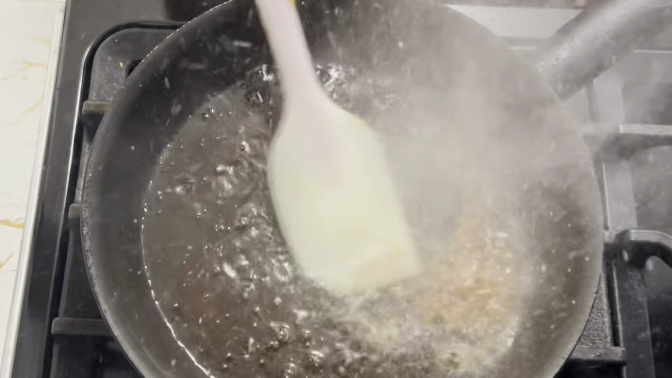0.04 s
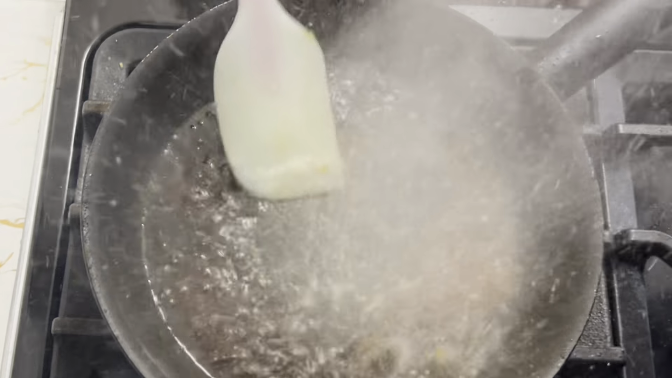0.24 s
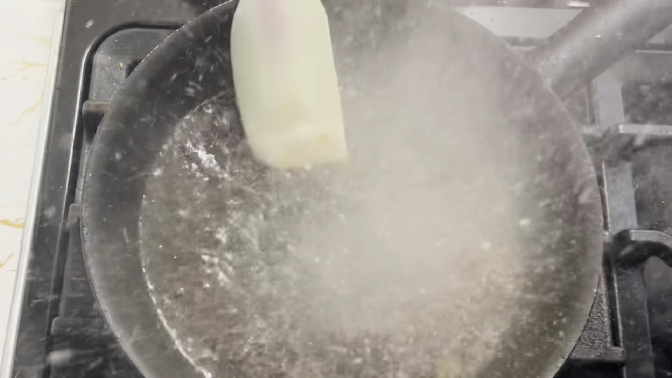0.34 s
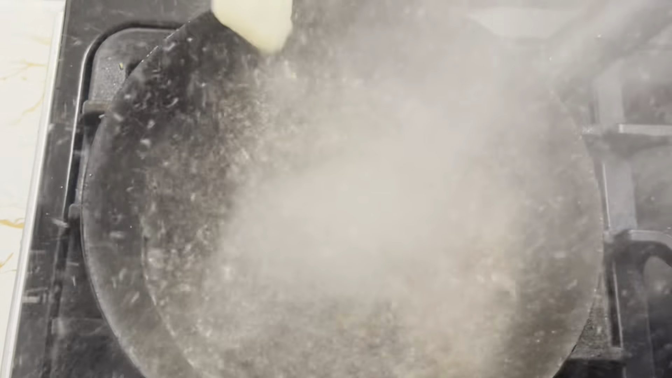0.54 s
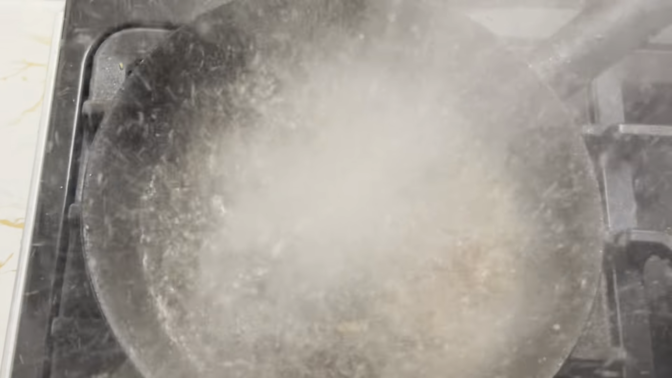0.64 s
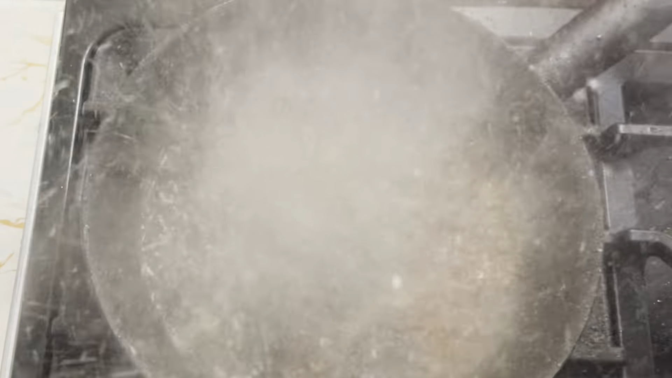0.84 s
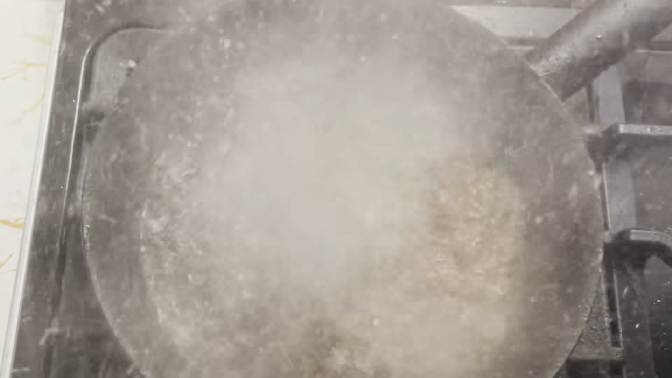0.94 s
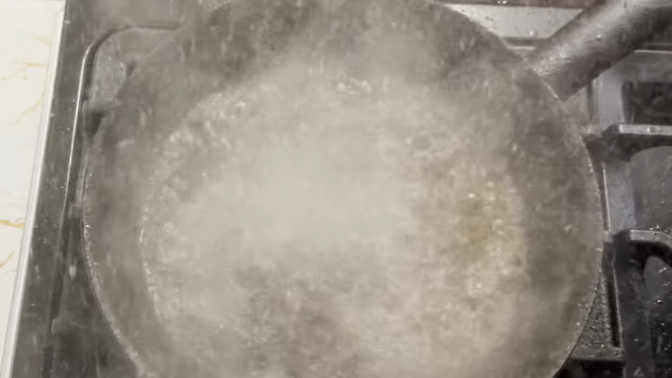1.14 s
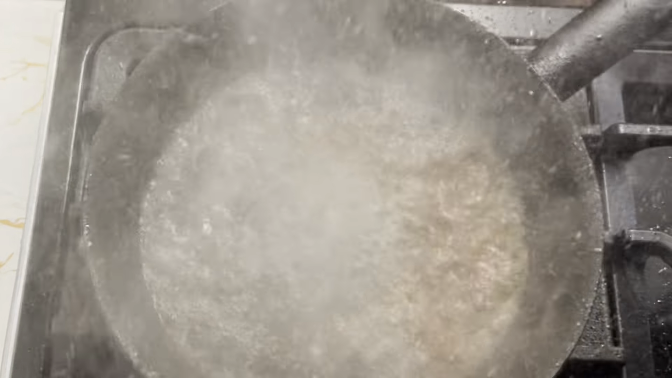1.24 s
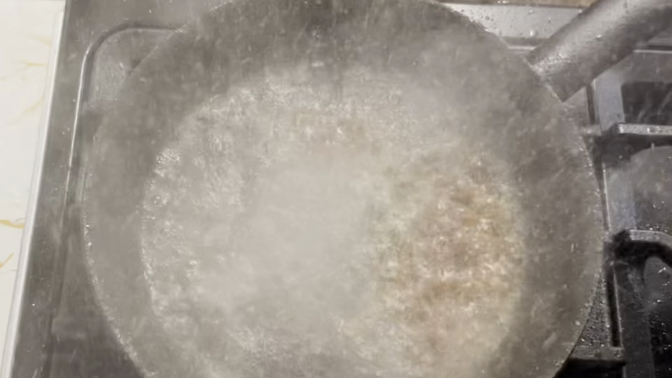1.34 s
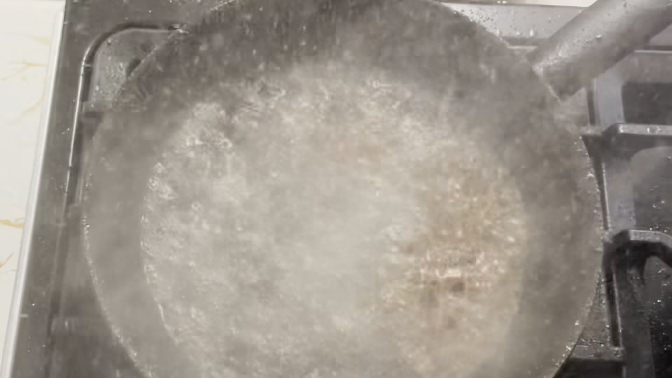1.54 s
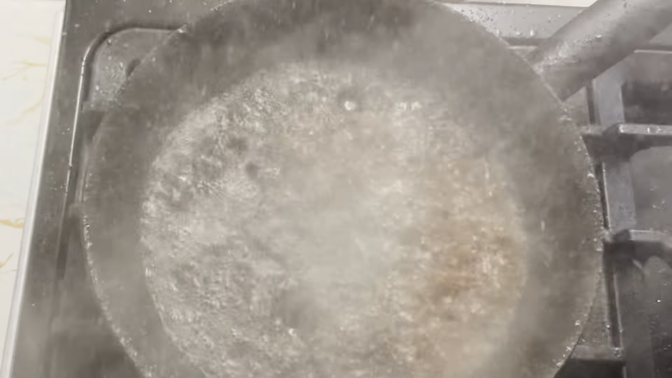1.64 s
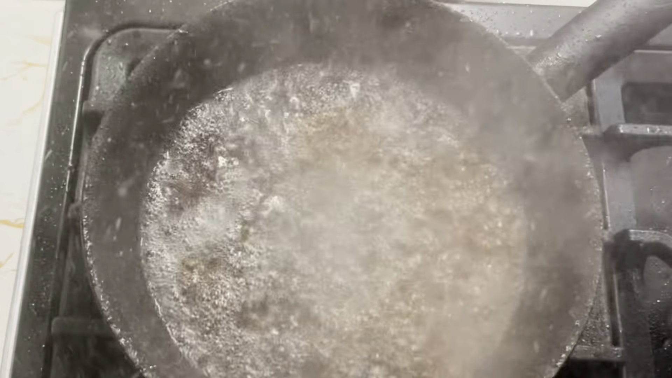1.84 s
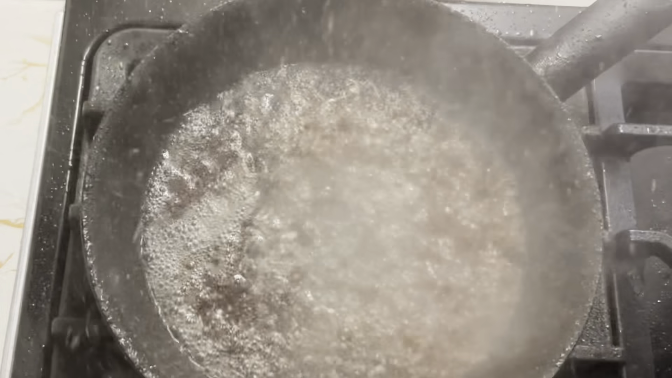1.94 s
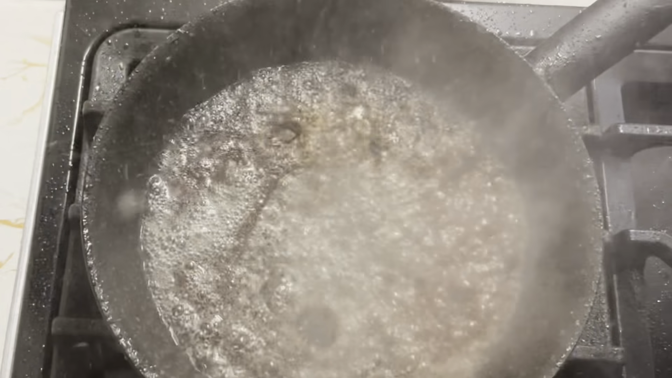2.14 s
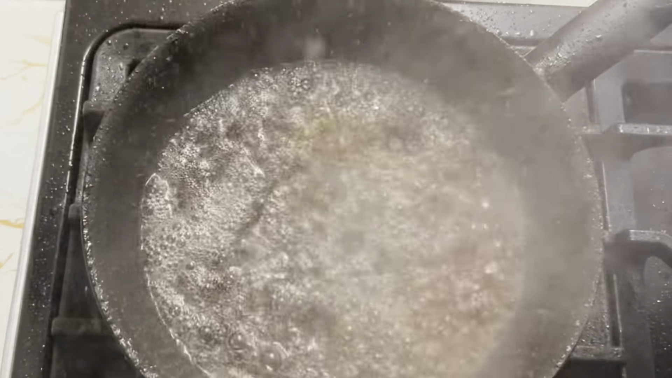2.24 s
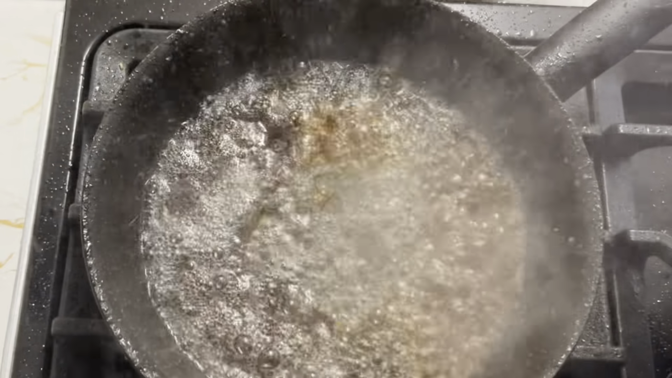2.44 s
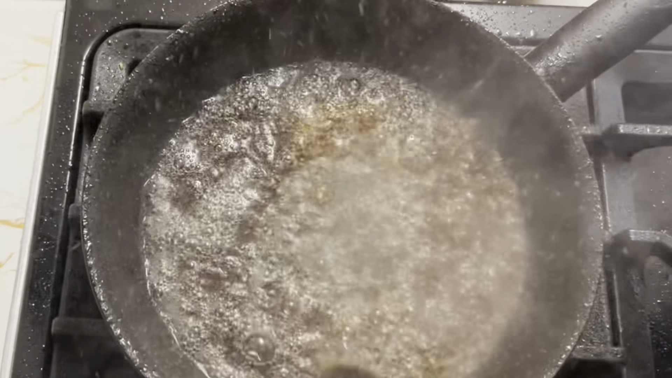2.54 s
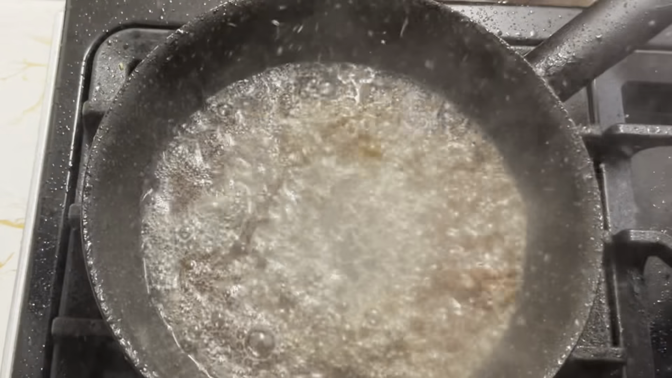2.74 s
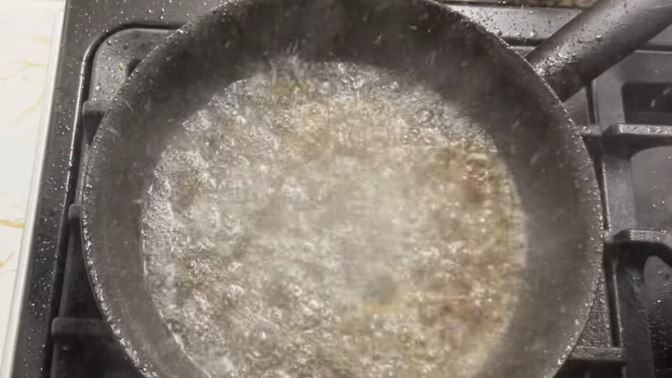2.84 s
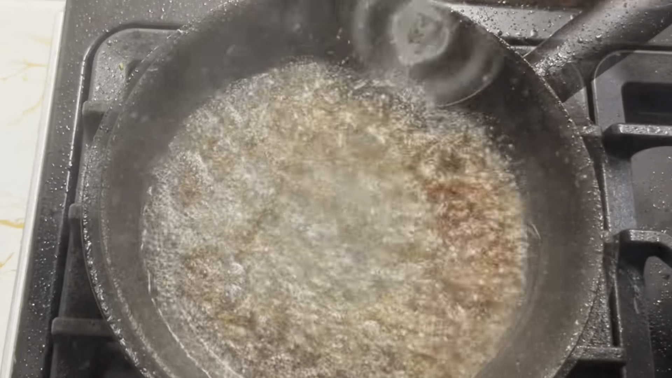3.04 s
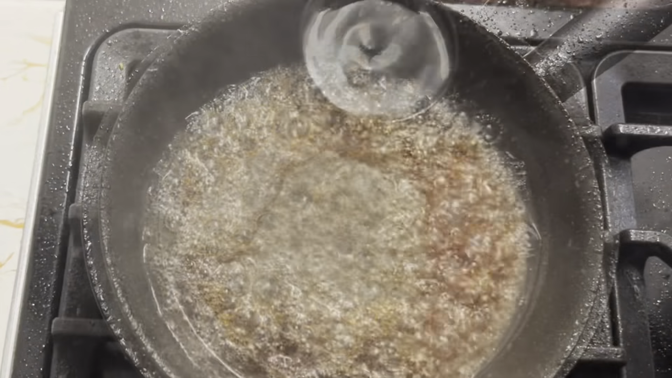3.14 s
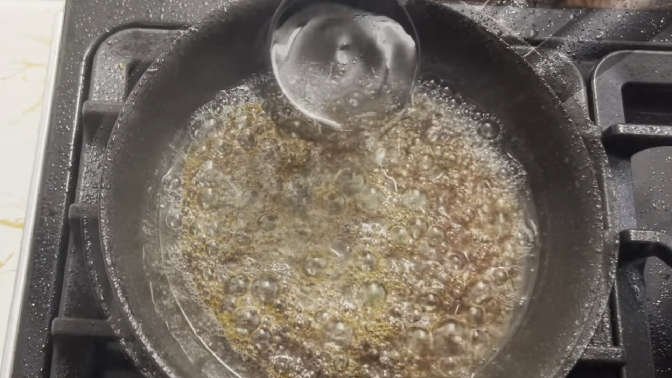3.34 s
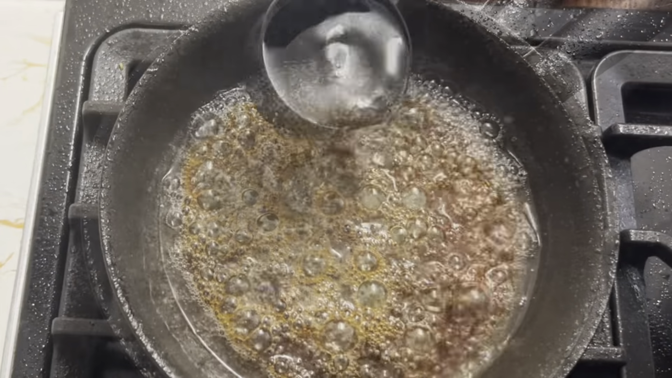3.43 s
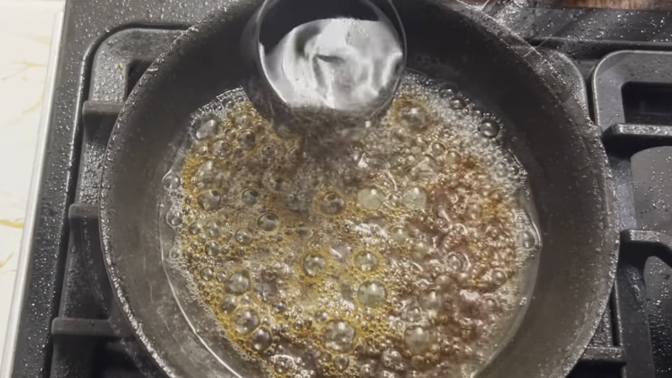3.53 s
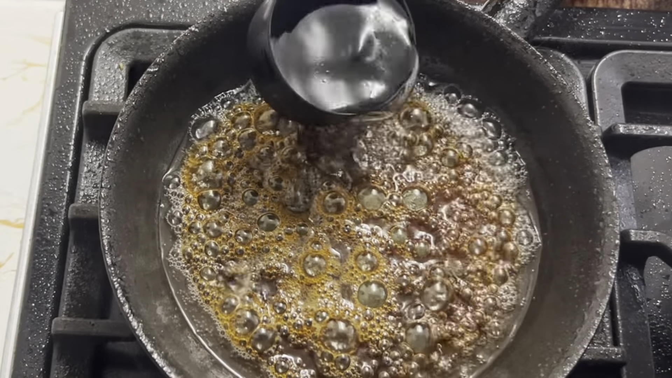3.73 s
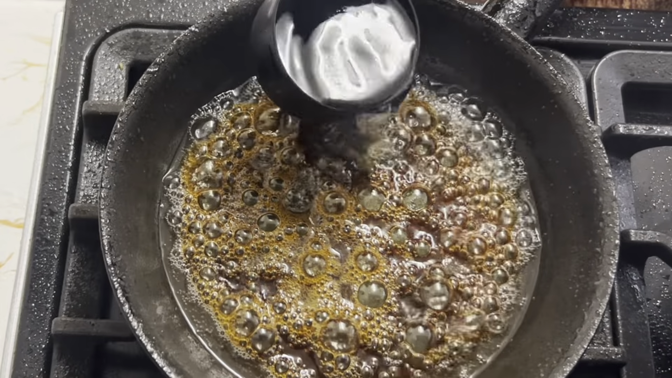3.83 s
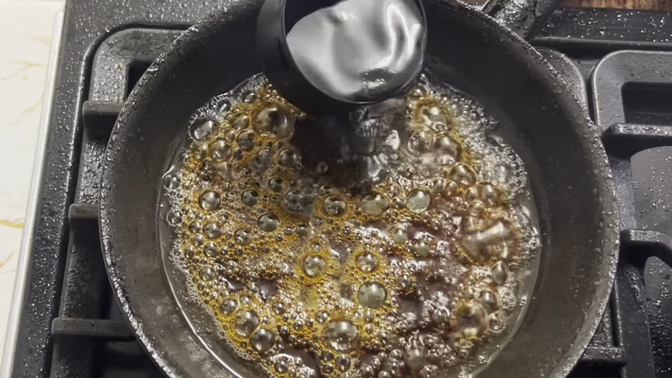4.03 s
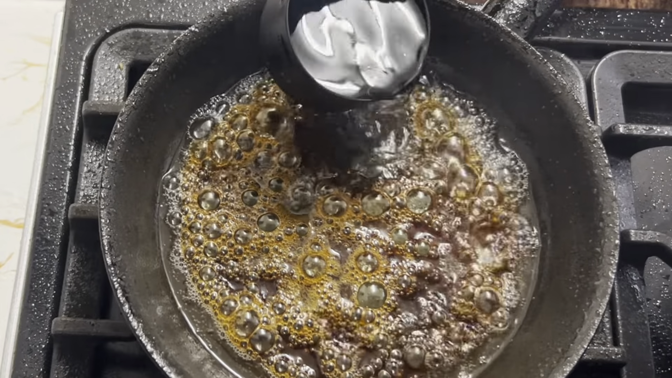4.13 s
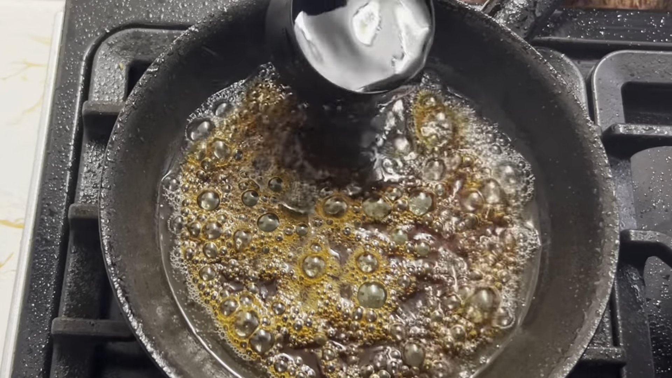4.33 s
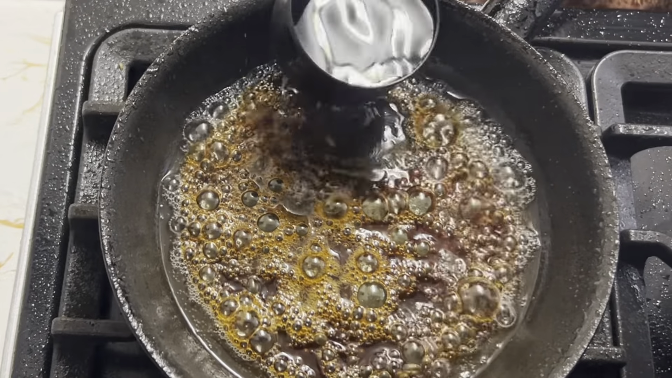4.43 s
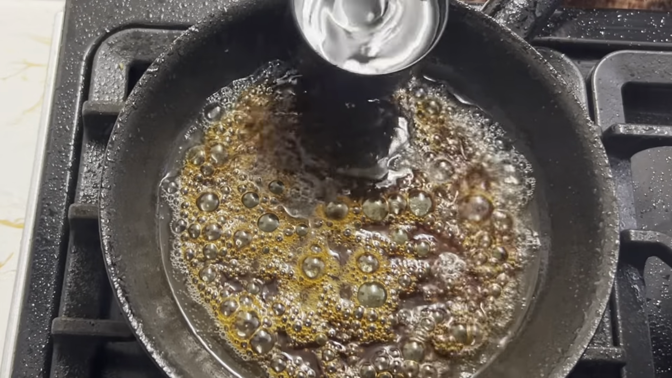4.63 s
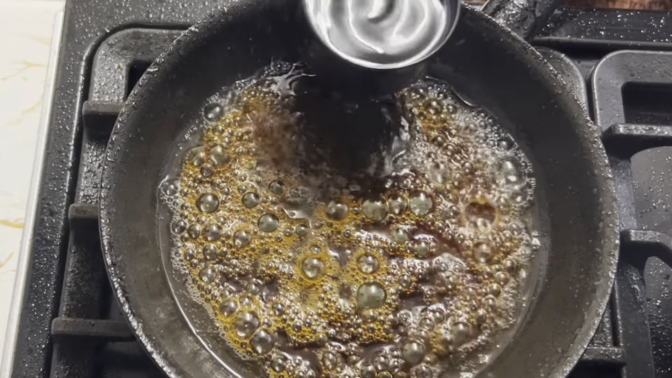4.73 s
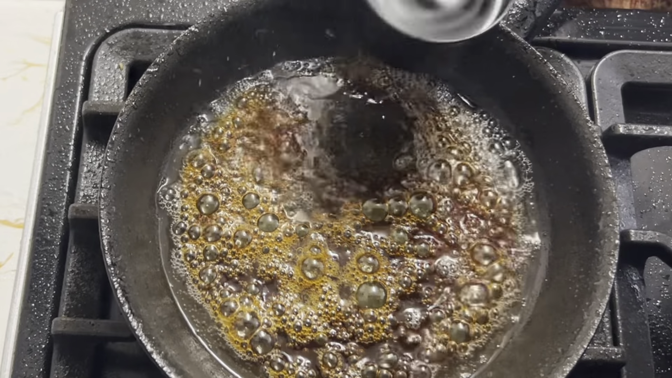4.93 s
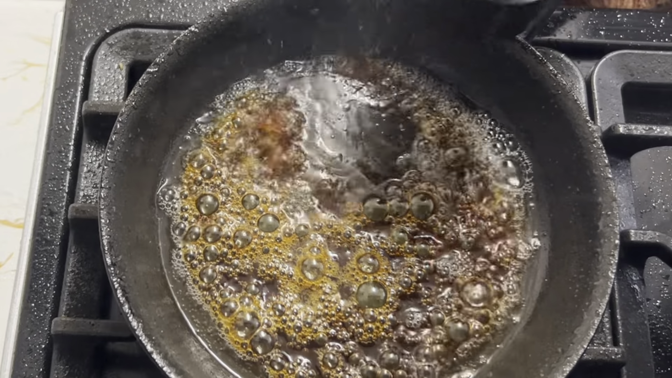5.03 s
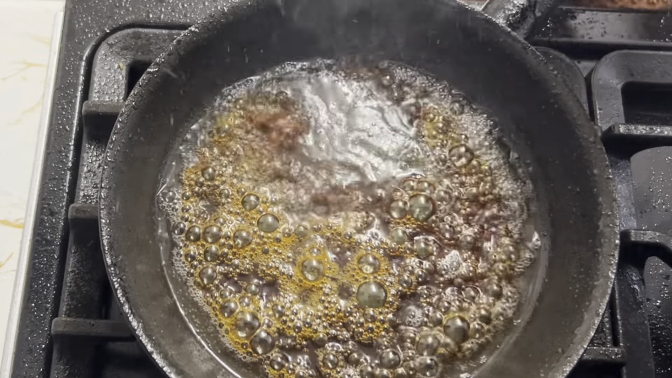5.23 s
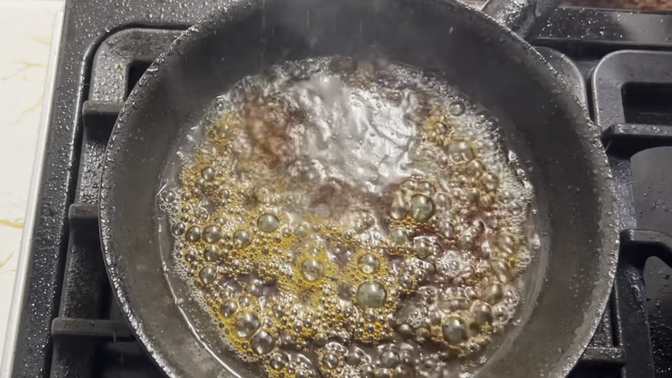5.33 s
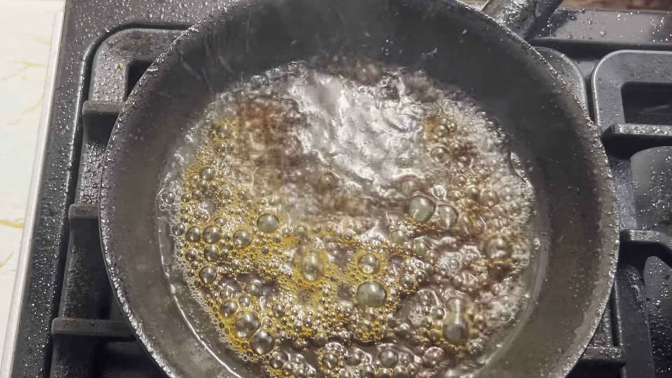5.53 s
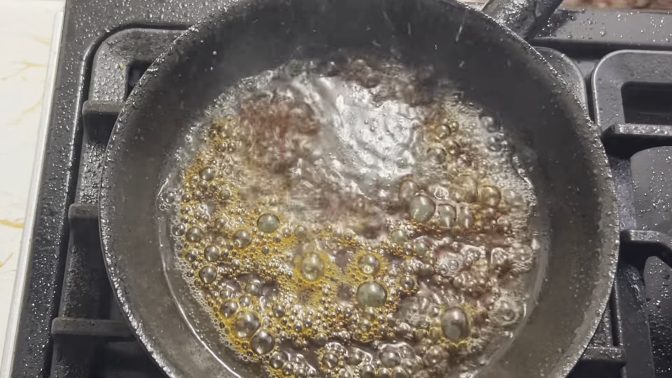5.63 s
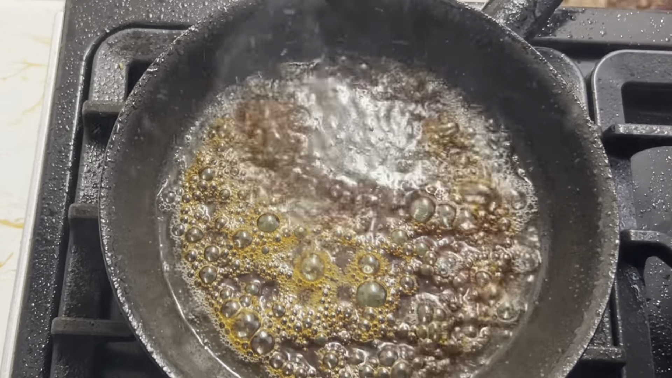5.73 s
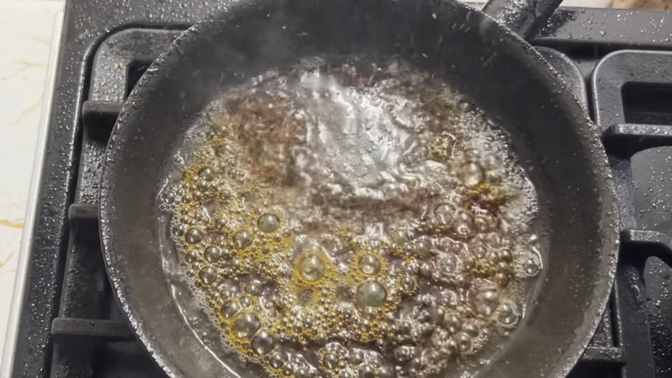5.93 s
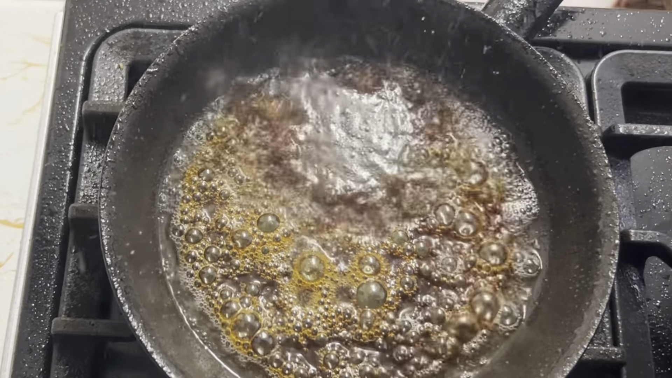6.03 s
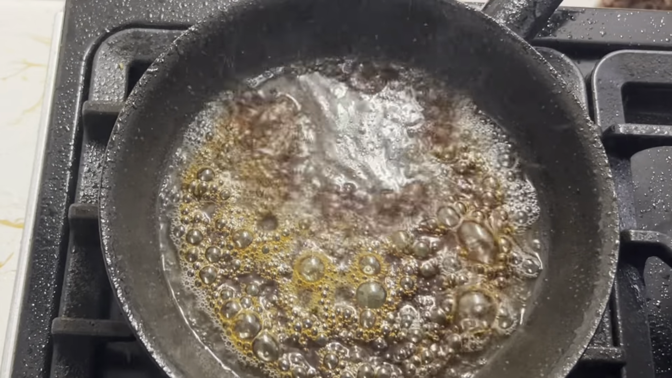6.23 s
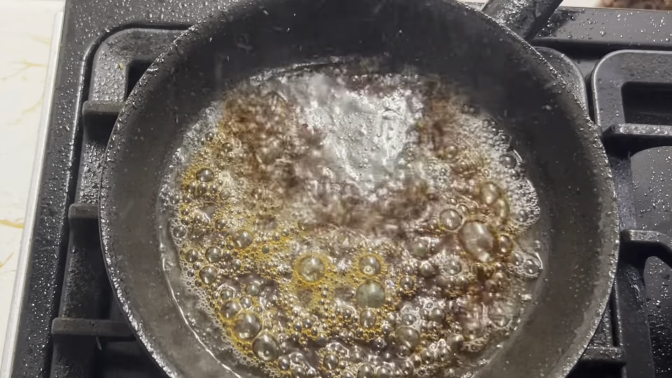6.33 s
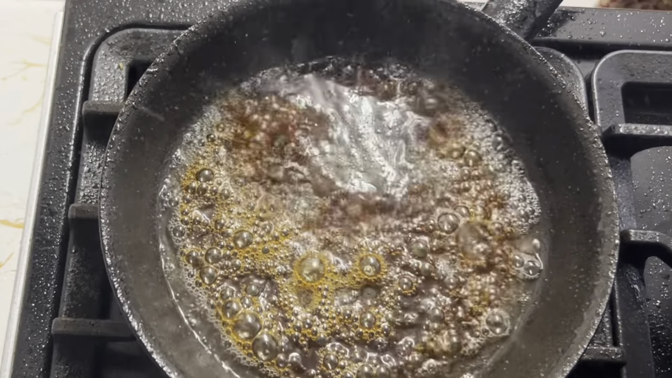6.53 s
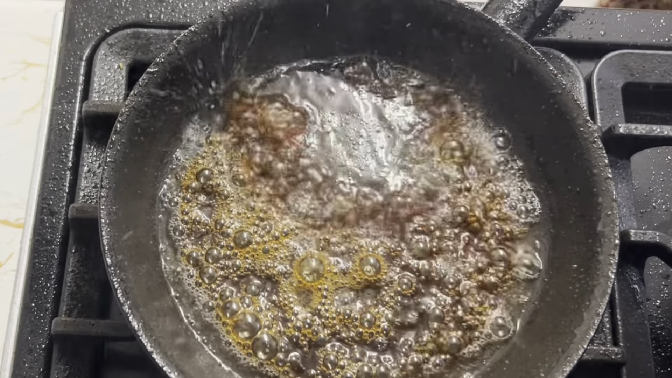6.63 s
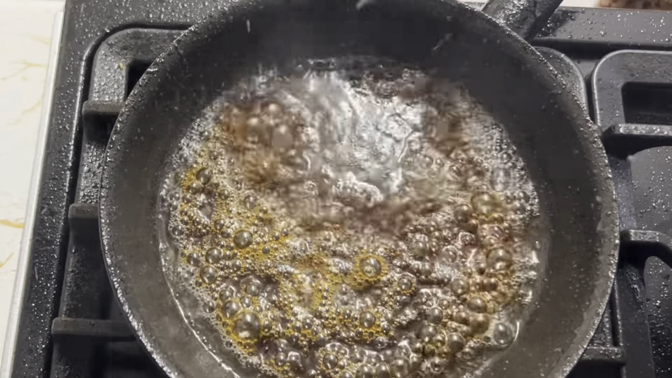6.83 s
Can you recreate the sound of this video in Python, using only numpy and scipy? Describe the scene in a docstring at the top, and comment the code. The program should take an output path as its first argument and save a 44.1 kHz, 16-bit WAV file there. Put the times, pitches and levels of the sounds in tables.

```python
"""Hot caramel and oil sizzle and pop as water boils off; poured water quenches them to single plops.
The sizzle then flares up again and thickens to a simmer, over a low hum and a rumble.
Random clicks through the colour and ring of the pan make the sizzle, crackle and pops.
Bubbles are short rising notes, gulps of steam are diving ones, spits and splashes are filtered noise.
A phone above the stove picks up the pan with the echoes of a small kitchen."""
import sys
import numpy as np
from scipy import signal
from scipy.fft import rfft, irfft, next_fast_len
from scipy.io import wavfile
from scipy.ndimage import uniform_filter1d

SR = 44100
rng = np.random.default_rng(int(sys.argv[2]) if len(sys.argv) > 2 else 0)


def wav_out(sig):
    """Save sig, one row per channel (or a flat mono array), as 16-bit PCM at SR to the path in sys.argv[1]."""
    wavfile.write(sys.argv[1], SR, np.round(np.clip(np.atleast_2d(sig).T, -1, 1) * 32767).astype(np.int16))


N = 417186
T = np.arange(N) / SR
SPOTS = 6  # places on the pan, each with its own random bursts and its own path to the phone
TOP_HZ = 16000  # highest pitch that the phone keeps


def undb(db):
    """Turn decibels into a gain."""
    return 10 ** (np.asarray(db) / 20)


def unit(x):
    """Scale to an rms (average strength) of 1."""
    return x / np.sqrt(np.mean(x ** 2))


def curves(table):
    """Draw straight lines between the table rows: each column as one value per sample."""
    s, *columns = np.transpose(table)
    return [np.interp(T, s, column) for column in columns]


def ramp(start_s, length_s):
    """A steady change from 0 to 1."""
    return np.clip((T - start_s) / length_s, 0, 1)


def swell(s, half_s):
    """A smooth rise to 1 at s seconds and back."""
    return np.exp(-((T - s) / half_s) ** 2)


def walk(rate):
    """Random levels held for 1 / rate seconds, with smooth slides between them; rms 1."""
    k = int(SR / rate)
    steps = np.repeat(rng.standard_normal(N // k + 1), k)
    return unit(uniform_filter1d(steps, k)[:N])


def seconds(length):
    """Time axis of a short sound."""
    return np.arange(int(length * SR)) / SR


def fade(t, t60):
    """Die away by 60 dB in t60 seconds."""
    return np.exp(-np.log(1000) * t / t60)


def band(x, lo_hz, hi_hz):
    """Keep the pitches between two limits, with gentle edges."""
    return signal.sosfilt(signal.butter(2, [lo_hz, hi_hz], "band", fs=SR, output="sos"), x)


def add(track, s, sound):
    """Mix a short sound in at s seconds."""
    i = int(np.clip(s * SR, 0, len(track) - 1))
    track[i:i + len(sound)] += sound[:len(track) - i]


def response(points):
    """A pulse of unit energy with the given spectrum, its energy as early as possible (minimum phase)."""
    size = 2048
    hz, db = np.transpose(points)
    bins_hz = np.arange(size // 2 + 1) * SR / size
    spectrum = undb(np.interp(np.log(bins_hz + 1), np.log(hz), db))
    cepstrum = irfft(np.log(spectrum))
    cepstrum[1:size // 2] *= 2
    cepstrum[size // 2 + 1:] = 0  # nothing may sound before the pulse
    h = irfft(np.exp(rfft(cepstrum)))
    return h / np.linalg.norm(h)


def through(x, h):
    """Send every row of x through the response h."""
    return signal.oaconvolve(x, np.atleast_2d(h), axes=1)[:, :N]


def hum(wavers_per_s=7, drift=0.0057):
    """Two low tones in the kitchen, drifting slightly in pitch, the upper one less steady in level."""
    # the tones: [f/Hz, rms level/dB before the changes below, waver/dB]
    hum_tones = [(48.4, -52.5, 1), (102.5, -52.5, 3)]
    # how the level of the hum changes: [t/s, change/dB]
    hum_levels = [(0, -2), (1.1, -5), (1.4, -30), (2.9, -17), (3.3, -10), (3.65, 0), (6.4, 1.5), (7.3, -4),
                  (9.46, -2.5)]
    tones = 0
    for hz, db, waver_db in hum_tones:
        turns = hz * np.cumsum(1 + drift * walk(2.6)) / SR
        tones = tones + undb(db + waver_db * walk(wavers_per_s)) * np.sin(2 * np.pi * turns)
    return np.sqrt(2) * tones * undb(curves(hum_levels)[0])


def kitchen(spots, near_db, room_db, near_t60=0.036, room_t60=0.18, apart_hz=1700, spacing_s=.00001):
    """Each spot reaches the phone's two ports directly, off the pan wall and stove, and through the room."""
    t, out, ports = seconds(.3), 0, np.array([[1], [-1]])
    dull = signal.butter(8, 8500, fs=SR, output="sos")
    apart = signal.butter(1, apart_hz, "high", fs=SR, output="sos")  # long waves reach both ports alike
    for spot, place in zip(spots, np.linspace(-1, 1, SPOTS)):
        h = np.sinc((t - .0004 + ports * place * spacing_s / 2) * SR)  # the direct sound
        for db, t60 in (near_db, near_t60), (room_db, room_t60):
            mid, side = signal.sosfilt(dull, rng.standard_normal((2, len(t))))
            both = 0.64 * mid + 0.77 * ports * signal.sosfilt(apart, side)
            echoes = both * fade(t, t60) * (t > .0008)
            h = h + undb(db) * echoes / np.linalg.norm(fade(t, t60))
        out = out + through(np.array([spot, spot]), h)
    return out


def cancel(x):
    """Echoes off the stove and wall cancel the direct sound at some pitches: cut dips there."""
    # the dips, cut one after the other: [f/Hz, width/Hz, depth/dB]
    echo_dips = [(463, 46, -14), (599, 55, -14), (749, 37, -3), (1310, 32, -7), (1763, 53, -3.5),
                 (2170, 54, -0.5)]
    for hz, width, db in echo_dips:
        x = x - (1 - undb(db)) * signal.lfilter(*signal.iirpeak(hz, hz / width, SR), x)
    return x


def rumble(level_db, side_db=-10):
    """The churning liquid shakes the pan on its grate: low noise of wavering level, nearly alike on both sides."""
    # spectrum of the rumble: [f/Hz, relative level/dB]
    rumble_colour = [(25, -26), (70, -16.5), (105, 0.5), (140, -2.5), (240, -5), (330, -8.5), (480, -13),
                     (900, -15.5), (3000, -102)]
    noise = through(rng.standard_normal((2, N)), response(rumble_colour))
    mid, side = noise * undb(level_db + 1.5 * walk(13))
    return mid + undb(side_db) * np.array([side, -side])


def gulps(rough=0.082, flutter_hz=220, opening=0.15, rise_s=0.016):
    """A large pocket of steam bursts open and swells fast, so its note dives and grows; its wall flutters."""
    # the pockets, the one at 0.821 s a low tail that rings on after the big gulp at 0.762 s: [t/s, level/dB
    # before the slow rise and fade, first f/Hz, last f/Hz, fade by 60 dB/s]
    steam_pockets = [(0.556, -18, 500, 110, 0.064), (.672, -23, 1000, 115.9, 0.054),
                     (0.762, -1.5, 695, 62, 0.098), (0.821, -32, 250, 51.67, 0.45),
                     (1.398, -15, 650, 400, 0.031), (2.208, -30, 600, 150, 0.046),
                     (2.437, -38, 600, 250, .05), (2.541, -24, 593, 60, 0.06),
                     (8.024, -27, 696, 260, 0.056), (8.224, -24, 210, 202, 0.11),
                     (8.282, -29, 210, 193, 0.16)]
    swell_s = .0038  # how fast the note dives
    out, t = np.zeros(N), seconds(.5)
    for s, db, first_hz, last_hz, t60 in steam_pockets:
        hz = last_hz + (first_hz - last_hz) * np.exp(-t / swell_s)
        flutter = unit(band(rng.standard_normal(len(t)), flutter_hz / 2, flutter_hz * 1.9))
        note = np.sin(2 * np.pi * np.cumsum(hz) / SR) + rough * flutter
        growth = 1 - (1 - opening) * np.exp(-(t / rise_s) ** 2)
        add(out, s, undb(db) * note * fade(t, t60) * growth)
    return out


def bubble(hz, cycles, glide=0.11, rise_s=0.00025):
    """A bubble rings as it opens: a short fading note, its pitch creeping up."""
    t60 = max(cycles / hz, .003)
    t = seconds(t60)
    note = np.sin(2 * np.pi * hz * t * (1 + glide * t / t60))
    return note * fade(t, t60) * (1 - np.exp(-t / rise_s))


def bubbling(level_db, per_second, low_hz, octaves, cycles, spread_db, count=1, cluster_s=.035, kinship=.12):
    """Random bubbles, large low ones more common, open in clusters of count that are alike in pitch."""
    out = np.zeros((SPOTS, N))
    clusters = int(per_second / count * N / SR)
    for k, cluster in enumerate(rng.random((clusters, count, 6))):
        when, pitch = cluster[0, :2]
        for size, damping, lag, offset in cluster[:, 2:]:
            hz = low_hz * 2 ** (octaves * pitch ** 1.2 + kinship * (2 * offset - 1))
            loud = undb(-spread_db * np.log(size + 0.052))
            note = bubble(hz, cycles * (.5 + damping))
            add(out[k % SPOTS], when * N / SR + cluster_s * lag, loud * note)
    return unit(out) / np.sqrt(SPOTS) * undb(level_db)


def plops(cycles=25, wet=0.34, splash_t60=0.01):
    """Large bubbles open one by one, each a ringing note with a small noisy splash around it."""
    # the single bubbles: [t/s, level/dB before the pan and room, f/Hz]
    single_bubbles = [(3.585, -30.5, 1790), (3.603, -27, 1780), (3.664, -24, 1710), (3.672, -21, 1620),
                      (3.678, -25, 1490), (3.696, -29, 1610), (3.703, -39, 2700), (3.742, -28, 1600),
                      (3.83, -32, 1840), (3.869, -35, 1500), (3.9, -29, 2580), (3.956, -31, 806),
                      (3.964, -23, 1750), (4.044, -25, 1750), (4.123, -34, 1410), (4.15, -36, 2500),
                      (4.272, -28, 1570), (4.376, -19.5, 2660), (4.407, -24, 2480), (4.724, -15, 1540),
                      (4.752, -11, 8100), (5.015, -18, 1500), (7.188, -8.5, 6660), (7.617, -13.5, 6630),
                      (7.958, -17.5, 2900), (8.158, -22, 1580), (8.237, -22, 3100), (8.251, -20, 1590),
                      (8.284, -21, 2980), (8.444, -19.5, 2430), (8.492, -21, 2300), (8.515, -17.5, 1860),
                      (8.564, -13.5, 2500), (8.636, -24, 1600), (8.652, -21, 2630), (8.688, -20, 2200),
                      (8.722, -21, 1600), (8.923, -26.5, 1610), (9.028, -17, 1720), (9.052, -15, 1650),
                      (9.055, -18, 2880), (9.069, -24, 2800), (9.077, -17, 1710), (9.087, -22.5, 1620),
                      (9.222, -23, 1480), (9.261, -18, 6070), (9.324, -28, 1480), (9.381, -27, 5100),
                      (9.403, -12.5, 2050)]
    out, t = np.zeros((SPOTS, N)), seconds(0.03)
    for k, (s, db, hz) in enumerate(single_bubbles):
        noise = band(rng.standard_normal(len(t)), hz * 0.55, hz * 1.07)
        splash = unit(noise) * fade(t, splash_t60)
        add(out[k % SPOTS], s, undb(db) * bubble(hz, cycles, glide=0.04))
        add(out[k % SPOTS], s, undb(db) * wet * splash)
    return out


def on_pan(pulse, direct_db, scatter_db=2.5, detune=0.0072):
    """A pulse plus the short ring of the liquid-damped pan, a little different on each spot; unit energy."""
    # what the pan rings with, before the random scatter: [f/Hz, width/Hz, relative level/dB]
    pan_rings = [(521.4, 20, 1), (851, 52, -3), (1034, 45, 3.5), (1237, 57, 1), (1576, 255, -0.5),
                 (1880, 170, -2), (2420, 160, -3.5), (2650, 200, 2), (3163, 54, 2), (3496, 90, -1),
                 (4940, 81, -3)]
    out = []
    for chance in rng.standard_normal((SPOTS, len(pan_rings), 2)):
        h = undb(direct_db) * pulse
        for (hz, width, db), (louder, sharper) in zip(pan_rings, chance):
            ringing = signal.iirpeak(hz * (1 + detune * sharper), hz / width, SR)
            h = h + undb(db + scatter_db * louder) * signal.lfilter(*ringing, pulse)
        out.append(h / np.linalg.norm(h))
    return np.array(out)


def small_spits(sizzle_db, per_second=32, above_db=1.5, spread_db=2.5, low_hz=3300, octaves=1.33):
    """Lesser droplets spit at random, louder with the sizzle: rows of (s, level dB, pitch Hz)."""
    when, size, pitch = rng.random((int(per_second * N / SR), 3)).T
    i = (when * N).astype(int)
    level_db = sizzle_db[i] + above_db + spread_db * (2 * size - 1)
    return list(zip(i / SR, level_db, low_hz * 2 ** (octaves * pitch)))


def spitting(sizzle_db, t60=0.016, ratio=1.24):
    """A droplet flashes to steam: a few milliseconds of hiss around one pitch."""
    # the clearest spits: [t/s, level/dB before the fade and room, f/Hz]
    clear_spits = [(.13, -23, 6500), (.497, -18, 5200), (.554, -22, 8000), (.882, -20, 6000),
                   (1.04, -19, 7040), (1.235, -20, 5800), (2.734, -24, 8300), (2.839, -21.5, 7000),
                   (3.27, -24, 7000), (3.473, -35.5, 7600), (3.63, -28, 6030), (3.763, -36.5, 3050),
                   (3.902, -39, 3200), (4.117, -36, 5160), (4.208, -24, 8400), (4.505, -21, 6200),
                   (4.753, -18, 7200), (6.072, -17, 8400), (6.911, -19, 8400), (7.188, -16.5, 7200),
                   (7.382, -24, 7900), (7.618, -37, 5500), (7.686, -24, 5800), (8.071, -30, 5500),
                   (8.136, -22, 7000), (8.581, -27, 6800), (8.603, -24.5, 3400), (8.61, -30, 5000),
                   (8.909, -29, 6600), (8.942, -26, 4950), (8.951, -30, 4440), (9.043, -25, 3000),
                   (9.143, -27.5, 5600), (9.293, -25.5, 8000), (9.357, -35, 5900)]
    out, t = np.zeros((SPOTS, N)), seconds(0.039)
    for k, (s, db, hz) in enumerate([*clear_spits, *small_spits(sizzle_db)]):
        hiss = unit(band(rng.standard_normal(len(t)), hz / ratio, hz * ratio))
        add(out[k % SPOTS], s, undb(db) * hiss * fade(t, t60))
    return out


def bursts(rate, spread_db, largest=3.36):
    """Random clicks, rate per second over all spots of the pan: mostly tiny, a few large."""
    happens = rng.random((SPOTS, N), dtype=np.float32) < rate / SPOTS / SR
    draw = rng.laplace(size=(SPOTS, N))[happens]
    clicks = np.zeros((SPOTS, N))
    clicks[happens] = np.sign(draw) * undb(spread_db * np.minimum(abs(draw), largest))
    return unit(clicks / np.sqrt(rate)) / np.sqrt(SPOTS)  # as strong when bursts are rare


def spatter(level_db, snap, crack, snap_db=-5):
    """Flying droplets burst: dry cracks that reach from the ring of the pan to the top."""
    droplets = bursts(170, spread_db=4.5, largest=2.8) * undb(level_db)
    return through(droplets, crack + undb(snap_db) * snap)


def small_pops(boil_db, hiss_db, per_second=8, above_db=14.0, spread_db=8.0,
               snap_db=-9, snap_spread_db=9, cavity_hz=1900, octaves=0.58):
    """Lesser random pops grow with the boil and snap more where it hisses: rows as in the table of pops."""
    when, size, snap, pitch = rng.random((int(per_second * N / SR), 4)).T
    i = (when * N).astype(int)
    level_db = boil_db[i] + above_db + spread_db * (2 * size - 1)
    treble_db = hiss_db[i] + snap_db + snap_spread_db * (2 * snap - 1)
    return list(zip(i / SR, level_db, treble_db, cavity_hz * 2 ** (octaves * (2 * pitch - 1))))


def pops(boil_db, hiss_db, snap, knock, cool, level_db=8.0, tear=0.11, tear_t60=0.023,
         cavity_db=-3, muffled_hz=2300):
    """A pop is a sharp pulse, a tearing film and a few swings of the cavity left; cool water muffles it."""
    # single loud pops: [t/s, relative level/dB, treble snap/dB against the knock, cavity f/Hz]
    loud_pops = [(.015, -7, -12, 1620), (0.028, -3, -9, 1800), (.165, -7, -10, 1622), (0.192, -5, -7, 1700),
                 (.212, -13, -1, 1680), (.241, -5, 0, 2800), (0.254, -9, -16, 1100), (0.299, -2, -1, 1510),
                 (0.358, 0, 7, 2000), (0.428, -5, -9, 1300), (.486, -9, 6, 1612), (.497, -7, 10, 2000),
                 (.519, -15, 9, 1720), (0.651, -7, -7, 1850), (0.673, -1.5, -14, 947),
                 (0.700, -2, -10, 1740), (.724, -9, 15, 1800), (.849, -7.5, -20, 1060),
                 (.915, -12, 16, 2798), (1.016, -8, 10, 1620), (1.201, -7.5, 2, 1619), (1.32, -15, 8, 1600),
                 (1.369, -12, 8, 1800), (1.384, -6, 5, 3300), (1.399, -7, 7, 1800),
                 (1.418, -12.5, -12, 1500), (1.451, -13.5, 8, 1600), (1.465, -10.5, 9, 1700),
                 (1.507, -8.5, -6, 1700), (1.559, -17, 3, 1600), (1.598, -17, 4, 850),
                 (1.636, -15.5, -5, 990), (1.645, -12.5, -5, 1500), (1.869, -15.5, -7, 957),
                 (1.922, -16, 8, 1600), (2.034, -19, 2, 1100), (2.118, -21, 5, 1600),
                 (2.207, -8, -10, 1436), (2.248, -18, -4, 2600), (2.354, -16, -3, 1650),
                 (2.386, -15.5, -7, 995), (2.437, -12.5, -2, 984), (2.466, -17.5, -12, 900),
                 (2.522, -16, -12, 1500), (2.541, -5.5, 0, 1730), (2.608, -12.5, -17, 1720),
                 (2.648, -8.5, 7, 2770), (2.85, -15.5, 7, 1800), (2.929, -16, 10, 1597),
                 (2.99, -15, 13, 1696), (3.099, -20, 8, 1700), (3.631, -26, -20, 850),
                 (3.795, -26.5, -10, 2300), (3.842, -19.5, -30, 1470), (3.935, -18, -5, 970),
                 (4.045, -20.5, -11, 1600), (4.135, -16, 2, 1600), (4.209, -16, 0, 1400),
                 (4.224, -18, 3, 1600), (4.271, -27, -9, 1550), (4.303, -13.5, -6, 1500),
                 (4.331, -15.5, -2, 1700), (4.42, -13.5, 3, 2400), (4.429, -11, -3, 2420),
                 (4.529, -6.5, -4, 1060), (4.824, -6, -11, 1470), (4.86, -8, -7, 1600),
                 (4.874, -10.5, 5, 1600), (4.972, -6, 5, 1550), (5.176, -10, -1, 1490),
                 (5.283, -11, 14, 1810), (5.49, -9, 10, 2900), (5.533, -6.5, -14, 1510),
                 (5.559, -11, 8, 1700), (5.632, -8, 10, 2600), (5.784, -5, -4, 2000),
                 (5.814, -5, -24, 1400), (5.833, -11, -2, 2400), (5.929, -9, -5, 2300),
                 (5.95, -10.5, 7, 1400), (6.045, -8, 3, 1600), (6.057, -9, 8, 2230),
                 (6.449, -7.5, 10, 1020), (6.605, -6, -5, 1390), (6.612, -13, 6, 1600),
                 (6.636, -9, 10, 1500), (6.657, -9, 16, 1600), (6.856, -11, 13, 1600),
                 (6.94, -13, 10, 2500), (6.976, -15, -5, 1900), (7.019, -4.5, 16, 1560),
                 (7.052, -13, -6, 1100), (7.15, -16, 7, 1800), (7.223, -3.5, 10, 1810),
                 (7.262, -14, -1, 2510), (7.275, -11, -6, 2500), (7.318, -14.5, 15, 2200),
                 (7.415, -11.5, -8, 2700), (7.518, -10.5, 18, 2800), (7.707, -10.5, 5, 1700),
                 (7.766, -13, 1, 2320), (7.808, -10.5, 4, 1590), (7.844, -13.5, -14, 2340),
                 (7.906, -15.5, -12, 1310), (8.021, -10.5, -5, 1250), (8.089, -8, 2.5, 2580),
                 (8.195, -8.5, -5, 2600), (8.282, -12.5, -20, 3020), (8.419, -12.5, -22, 2700),
                 (8.445, -11, -16, 1900), (8.509, -11, -11, 1600), (8.771, -15, -6, 1730),
                 (8.879, -16.5, -18, 1200), (8.984, -13, 17, 1900), (8.994, -15, 4, 2000),
                 (9.404, -3, -18, 2120)]
    out, t = np.zeros((SPOTS, N)), seconds(.03)
    rows = [*loud_pops, *small_pops(boil_db, hiss_db)]
    for k, (s, db, treble_db, cavity_hz) in enumerate(rows):
        push = tear * rng.standard_normal(len(t)) * fade(t, tear_t60)
        push[0] = 1
        pop = signal.fftconvolve(push, knock[k % SPOTS] + undb(treble_db) * snap[k % SPOTS])
        covered = cool[min(int(s * SR), N - 1)]
        top_hz = TOP_HZ * (muffled_hz / TOP_HZ) ** (covered ** 2)
        pop = signal.lfilter(*signal.butter(2, top_hz, fs=SR), pop)
        pop /= np.linalg.norm(pop)
        cavity = bubble(cavity_hz, cycles=5.8)
        add(pop, 0, undb(cavity_db) * cavity / np.linalg.norm(cavity))
        add(out[k % SPOTS], s, undb(db + level_db) * pop / np.linalg.norm(pop))
    return out


def flares():
    """Liquid slops onto bare metal and the sizzle flares, or lifts off and it sinks: change in dB."""
    # each smooth rise or dip: [t/s at its height, half length/s, change/dB]
    slops = [(0.133, 0.015, -7), (0.272, 0.01, -8), (0.32, 0.0069, -2), (0.38, .012, 3.5),
             (0.436, 0.013, 5), (0.456, 0.01, -13), (0.785, 0.013, -5), (1.17, .018, 4), (1.236, .014, 0),
             (1.37, 0.013, 5), (4.166, 0.014, -4), (4.216, 0.011, 3), (4.397, 0.014, -12), (4.417, .012, 6),
             (4.454, 0.024, 6.5), (4.511, 0.02, 9), (4.66, 0.11, -0.5), (6.06, 0.034, 2),
             (6.426, 0.014, 5.5), (7.683, 0.02, 6), (8.14, 0.1, 5), (8.766, 0.037, 8.5)]
    return sum(db * swell(s, half_s) for s, half_s, db in slops)


def spurts(per_second, t60, spread_db):
    """Water meets hot metal in spurts that start at once and die away; power close to 1 on average."""
    chance, draw = rng.random(N), rng.exponential(size=N)
    kicks = (chance < per_second / SR) * undb(spread_db * np.minimum(draw, 1.8)) ** 2
    power = signal.lfilter([1], [1, -fade(1 / SR, t60) ** 2], kicks)
    return power / uniform_filter1d(power + 1e-9, SR // 5)


def frying(sizzle_db, crackle_db, rate, snap, knock):
    """Fine bursts hiss, fewer sharp ones spit, coarse ones knock on the pan; the water feeds them in spurts."""
    share = .46  # of the power that comes in spurts
    surge = np.sqrt(1 - share + share * spurts(per_second=75, t60=0.056, spread_db=5.5))
    fine = bursts(rate * 2, spread_db=5.0)
    spits = bursts(rate * .03, spread_db=5.3, largest=3.4)
    coarse = bursts(rate * .13, spread_db=2.5, largest=3.24)
    hiss = (fine + 0.45 * coarse) * surge + .52 * spits
    sizzle = through(hiss * undb(sizzle_db), snap)
    crackle = through(coarse * surge * undb(crackle_db), knock)
    return sizzle + crackle


def scene():
    """The boil drives most layers; cool water smothers the sizzle, and thick syrup trades it for bubbles."""
    # how hard the water boils off: [t/s, relative level/dB]
    boil_levels = [(0, -27.5), (0.65, -29.5), (0.95, -34.5), (1.3, -38), (1.58, -41), (2.1, -42),
                   (2.85, -42), (3.25, -45), (3.5, -55), (3.85, -53.5), (4.08, -47), (4.3, -37.5),
                   (4.9, -29), (5.35, -31), (6.45, -31), (7.1, -36.5), (8.2, -39), (9.46, -42)]
    # cool water spreads, then heats up: [t/s, share of the pan that it covers/0-1]
    cool_shares = [(3.5, 0), (3.62, 0.44), (3.82, 0.83), (4.09, 0.7), (4.19, 0.41), (4.38, 0.52),
                   (4.62, 0.34), (5.1, 0.21), (6.5, 0.19)]
    # spectrum of a tiny burst at the surface: [f/Hz, relative level/dB]
    sizzle_colour = [(200, -26.5), (700, -31.5), (1500, -4), (2600, 2), (4000, 0.5), (6400, 2),
                     (7300, -0.5), (8400, 5.5), (9500, -0.5), (11000, -7.5), (13000, -7), (16000, -8.5)]
    # spectrum of a larger burst: [f/Hz, relative level/dB]
    pop_colour = [(60, -28.5), (200, -8.5), (450, -14), (620, -3.5), (780, 1.5), (1100, -2.5), (1350, -5.5),
                  (1650, 0.5), (2100, -3.5), (3200, -13.5), (5000, -14.5), (12000, -31.5)]

    cool = np.clip(curves(cool_shares)[0], 0, 1)
    full = ramp(3.7, 0.85)  # the second ladle pours and the pan fills
    thick = ramp(6.6, 1.7)  # the syrup thickens
    heaves = thick * walk(11)  # thick syrup lets the steam out unevenly
    boil_db = curves(boil_levels)[0] + heaves

    # levels against the boil, with their change under cool water, in the fuller pan and in thick syrup
    sizzle_db = boil_db + 3 - 20 * cool - 0.5 * full - 3 * thick + flares()
    crackle_db = boil_db - 1.5 - 2 * cool
    spatter_db = boil_db - 5 - 24 * cool
    bubble_db = boil_db - 12.5 - 11 * cool + 12.5 * thick
    rumble_db = boil_db - 16 + 10 * cool + 2 * full

    # base rate of bursts per second, in thin hot liquid, under cool water and in thick syrup
    hot_rate, cool_rate, thick_rate = 6000, 900, 1300
    rate = hot_rate * (cool_rate / hot_rate) ** cool * (thick_rate / hot_rate) ** thick

    snap = on_pan(response(sizzle_colour), direct_db=8.5)  # a tiny burst at the surface
    knock = on_pan(response(pop_colour), direct_db=-7.0)  # a larger one against the metal
    crack = on_pan(response(pop_colour), direct_db=-4.5)  # one that breaks through into the air

    simmer = bubbling(bubble_db, per_second=190, low_hz=1389, octaves=1.325, cycles=22, spread_db=2.0, count=3)
    # large bubbles in the fresh water
    gurgle = bubbling(boil_db - 2, per_second=150, low_hz=1190, octaves=0.61, cycles=23, spread_db=5) * cool
    fizz = bubbling(sizzle_db - 8.5, per_second=420, low_hz=3265, octaves=1.53, cycles=15.6, spread_db=7.0)
    pan_ring = on_pan(signal.unit_impulse(SR // 20), direct_db=4.0)
    bubbles = through(simmer + gurgle + fizz + plops(), pan_ring)

    droplets = spatter(spatter_db, snap, crack) + spitting(sizzle_db)
    popping = pops(boil_db, sizzle_db - boil_db, snap, crack, cool)
    pan = frying(sizzle_db, crackle_db, rate, snap, knock) + popping + droplets + bubbles
    stream = rumble(-54.5) * swell(3.65, 0.43)  # low churn of the poured water
    return cancel(kitchen(pan, near_db=-5, room_db=-4)) + rumble(rumble_db) + stream + gulps() + hum()


def record(dry):
    """The phone rounds loud peaks; its two ports drift apart in phase in the treble; the top is cut."""
    # phase by which the left port lags the right: [f/Hz, lag/turns]
    port_lag = [(0, 0), (1500, 0), (3000, -.11), (7600, -.1), (8700, .08), (10200, .5), (11800, 1),
                (12500, 1.02), (13750, 1.5), (15200, 2)]
    ceiling = .6
    left, right = ceiling * np.tanh(dry / ceiling)
    hz, turns = np.transpose(port_lag)
    size = next_fast_len(N + SR // 10)
    lag = np.interp(np.arange(size // 2 + 1) * SR / size, hz, turns)
    lagged = irfft(rfft(left, size) * np.exp(-2j * np.pi * lag), size)[:N]
    left = undb(0.91) * lagged  # the left port is slightly louder
    top_cut = signal.ellip(10, .2, 80, TOP_HZ, fs=SR, output="sos")
    return signal.sosfilt(top_cut, np.array([left, right]))


dry = scene()
out = record(dry)
wav_out(out)
```